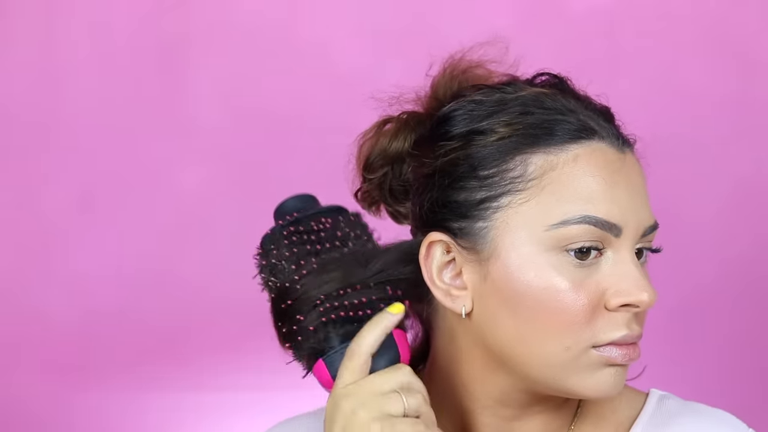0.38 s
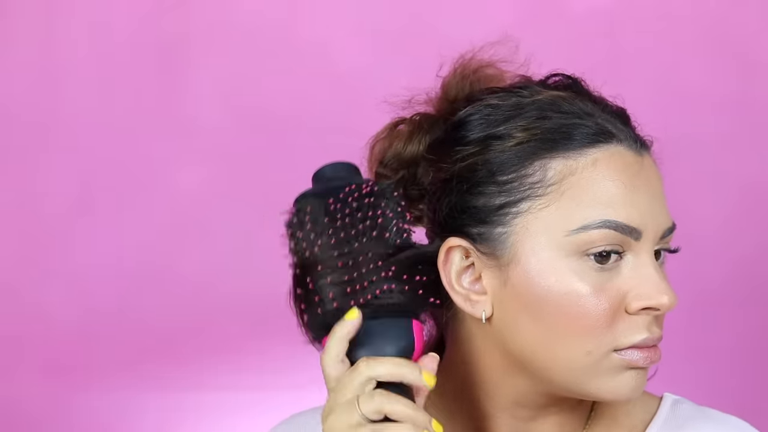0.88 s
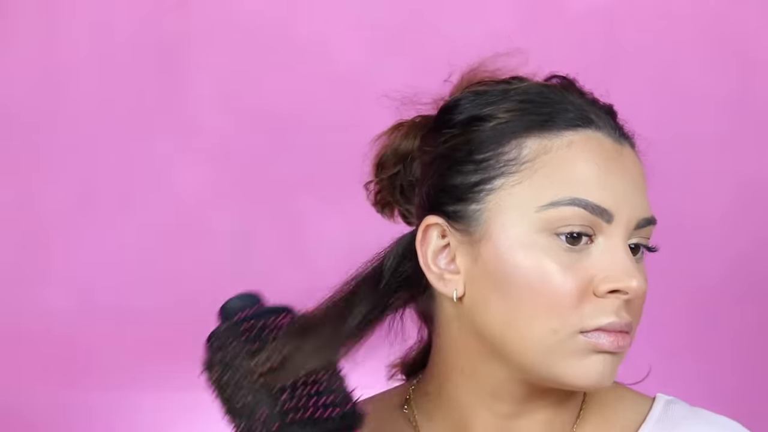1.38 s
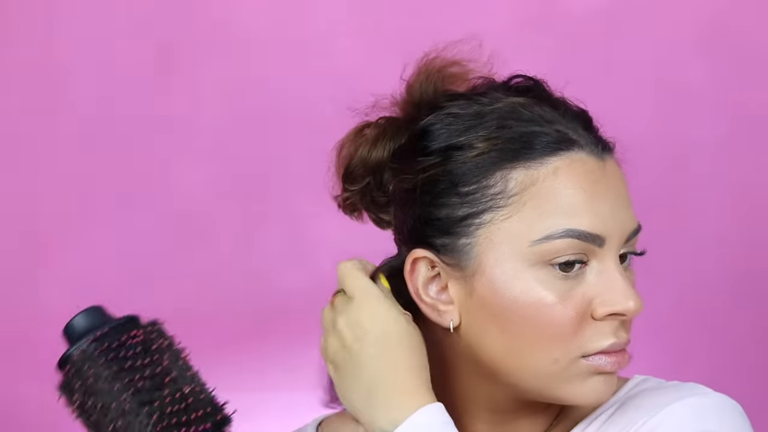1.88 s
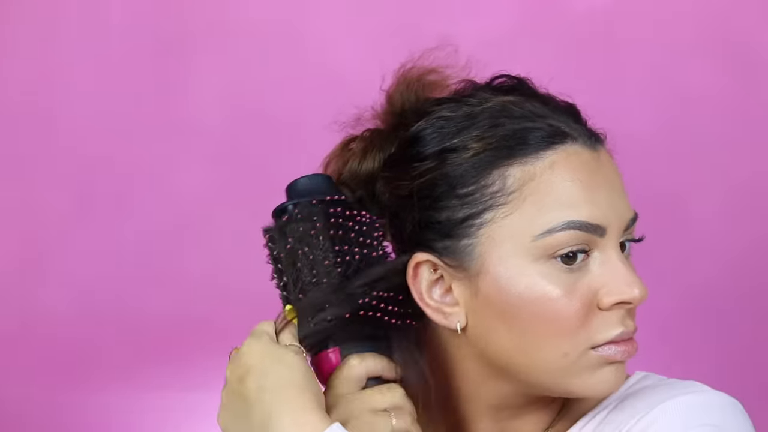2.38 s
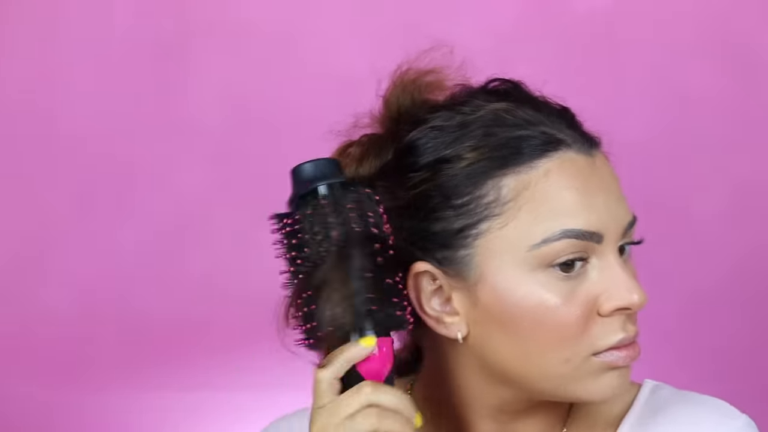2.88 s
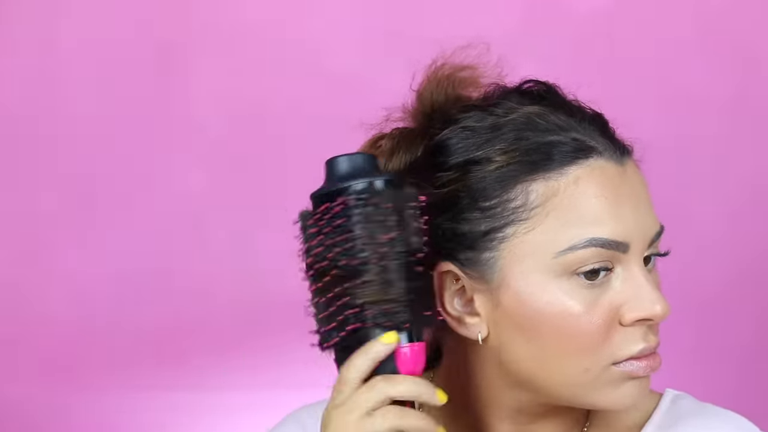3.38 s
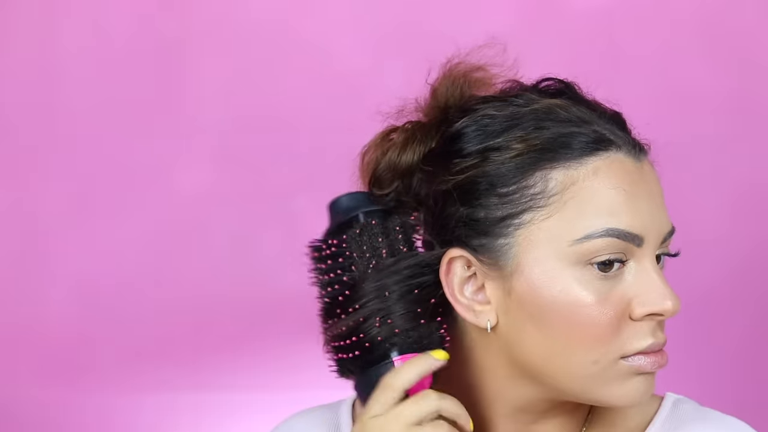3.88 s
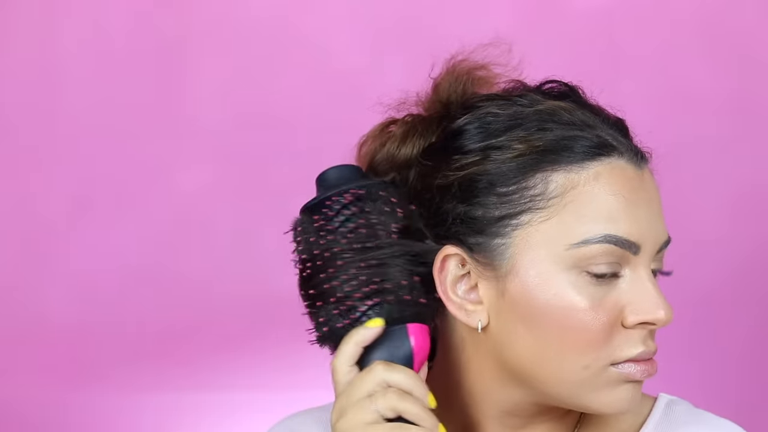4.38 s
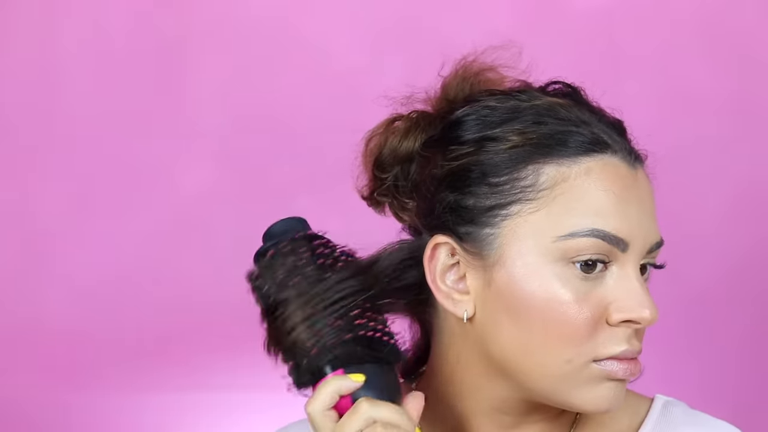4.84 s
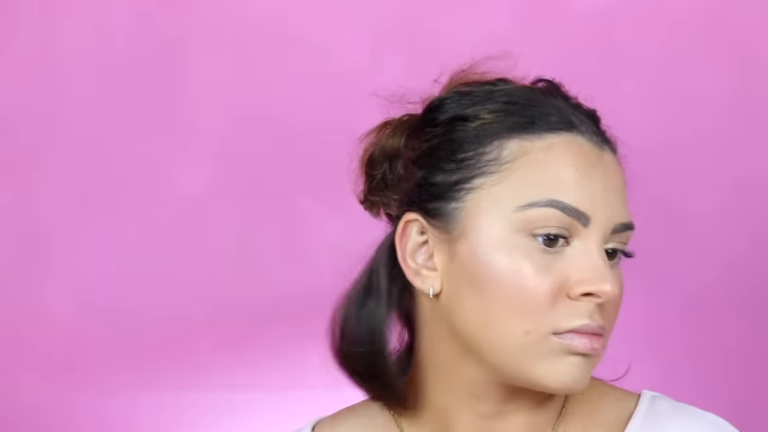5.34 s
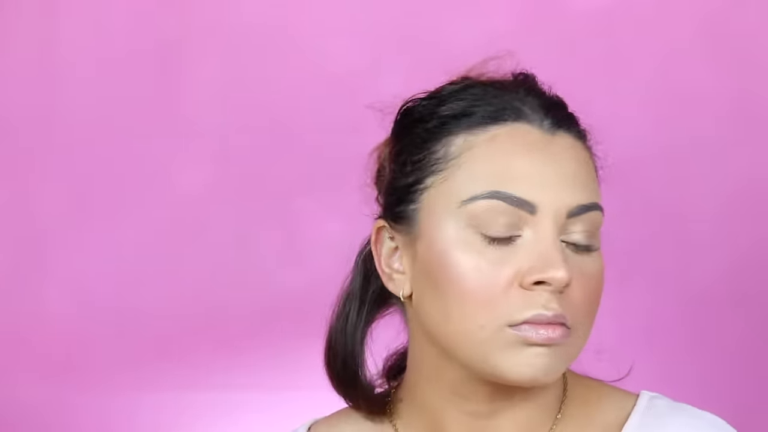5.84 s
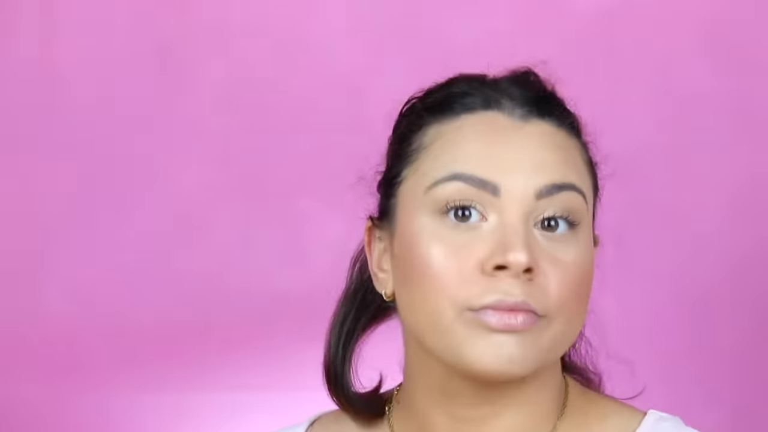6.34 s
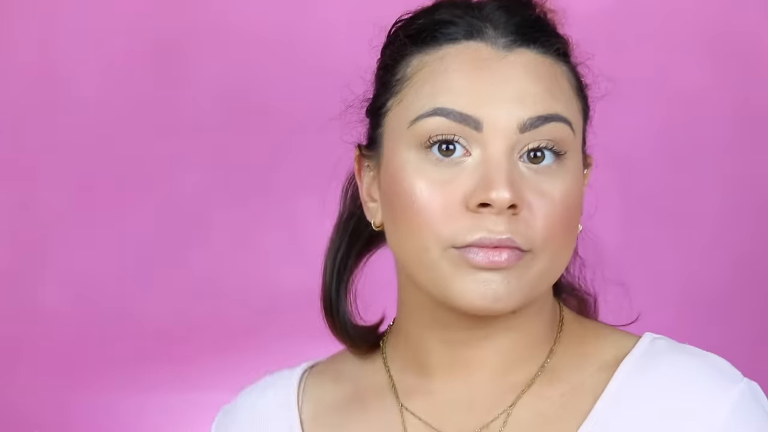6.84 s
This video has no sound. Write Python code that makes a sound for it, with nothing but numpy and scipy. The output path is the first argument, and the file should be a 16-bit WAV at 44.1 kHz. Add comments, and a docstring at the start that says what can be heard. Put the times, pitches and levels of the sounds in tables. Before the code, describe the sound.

A hair dryer brush runs for almost six seconds, close and dry: broad rushing air, slightly boomy and changing colour, under a high fan tone pulsing irregularly. It fades fast, then a cut brings louder room tone and the motor winding down, its hum dropping in pitch with a rough rattling scrape. Hair and cloth swish briefly while the brush meets the tabletop in several muffled bumps.

```python
"""In a room, close to one microphone, a hot-air styling brush roars: shaped noise for the turbulent air,
sines for the whine of a seven-blade fan, whose tones swell and sink as the brush turns in the hair.
The roar fades out; at a cut the room tone jumps up and the motor is heard running down, as a falling
hum with ticks and scrape ringing the housing. Cloth and hair rustle in humps of noise, and the brush
is laid on a table in soft blows that ring its modes."""
import sys
import numpy as np
from scipy import signal
from scipy.io import wavfile
from scipy.ndimage import uniform_filter1d

SR = 44100
rng = np.random.default_rng(int(sys.argv[2]) if len(sys.argv) > 2 else 0)


def level_to_linear(level):
    """Convert decibel levels to linear amplitude factors, elementwise."""
    exponent = np.asarray(level, float) / 20
    return 10 ** exponent


def transcribe(u):
    """Save the signal u as a 16-bit wav file named by the first command-line argument.

    u: samples, shape (n,) or (channels, n), limited to [-1, 1]; the rate is SR.
    q: integer samples, one column per channel.
    """
    v = np.clip(np.atleast_2d(u).T, -1, 1)
    q = np.round(v * 32767).astype(np.int16)
    wavfile.write(sys.argv[1], SR, q)


N = 307818
FRAME, HOP = 1024, 256  # short-time spectra (samples)
HZ = np.fft.rfftfreq(FRAME, 1 / SR)
FRAME_S = np.arange(N // HOP + 5) * HOP / SR
T = np.arange(N) / SR
CUT_S = 6.005
AFTER_CUT = T > CUT_S
FADE_DB = -23  # reached by the roar at the cut


def evened(x):
    """Scales to rms 1."""
    return x / np.sqrt(np.mean(x ** 2) + 1e-20)


def read(points, hz=HZ):
    """Reads a spectrum in dB at the frequencies hz, on a log frequency axis."""
    f, value = np.transpose(points)
    return np.interp(np.log(hz + 1), np.log(f + 1), value)


def columns(rows, t):
    """Reads every column of a curve table at the times t."""
    s, *values = np.transpose(rows)
    return [np.interp(t, s, v) for v in values]


def unit(colour_db):
    """Shifts a spectrum so that its mean power is 0 dB, as a column over frequency."""
    return (colour_db - 10 * np.log10(np.mean(level_to_linear(colour_db) ** 2)))[:, None]


def noise(field_db):
    """Noise from random short-time spectra; 0 dB in all bins gives rms 1."""
    real, imaginary = rng.standard_normal((len(FRAME_S), len(HZ), 2)).T
    spectra = (real + 1j * imaginary) * level_to_linear(field_db)
    return signal.istft(spectra, nperseg=FRAME, noverlap=FRAME - HOP)[1][:N] / 39


def steady_noise(colour_db):
    """Noise of one unchanging colour."""
    return noise(unit(colour_db) + 0 * FRAME_S)


def drift(size, count):
    """Slow chance curves, rms 1 together, smoothed twice over size frames."""
    rows = rng.standard_normal((count, len(FRAME_S)))
    return evened(uniform_filter1d(uniform_filter1d(rows, size), size))


def quick_drift(size):
    """A chance curve of rms 1, smoothed over size samples."""
    return evened(uniform_filter1d(rng.standard_normal(N), size=size))


def resonate(x, hz, width):
    """Two-pole resonance of gain 1 at its peak."""
    return signal.lfilter(*signal.iirpeak(hz, hz / width, SR), x)


def resonate_twice(x, hz, width):
    """Two equal resonances in a row, for steep skirts."""
    return resonate(resonate(x, hz, width), hz, width)


def fading(t, lead_s=0):
    """Progress of the roar's fade: 0 until it starts, 1 at the cut and larger beyond."""
    start_s, curve = 5.8, 1.3
    return np.clip((t + lead_s - start_s) / (CUT_S - start_s), 0, 2) ** curve


def rising_db(t):
    """The quiet layers creep in under the roar and jump up at the cut."""
    start_s, from_db, to_db, after_db = 5.05, -27, -11.5, 1
    share = (t - start_s) / (CUT_S - start_s)
    creep_db = np.where(share < 0, -40, from_db + (to_db - from_db) * share)
    return np.where(t > CUT_S, after_db, creep_db)


# Colour of the room tone: (frequency [Hz], relative level [dB per Hz])
ROOM_COLOUR = [(15, -47), (25, -11), (70, -12.5), (193, -2.5), (267, -7), (538, -10), (1310, -12.5),
               (1910, -14), (5740, -15), (15600, -29.5)]


def room_tone(level_db=-50):
    """Steady coloured noise of the room, lifted along the rise of the quiet layers."""
    return level_to_linear(level_db + rising_db(T)) * steady_noise(read(ROOM_COLOUR))


# Colour of the hiss that differs between the channels: (frequency [Hz], relative level [dB per Hz])
HISS_COLOUR = [(15, -8.5), (25, 5), (550, -9), (920, -16), (1200, -42), (11500, -42), (13000, -23),
               (15600, -16)]


def hiss_apart(level_db=-66):
    """Faint hiss, to be added to one channel and taken from the other; it rises with the room tone."""
    return level_to_linear(level_db + rising_db(T)) * steady_noise(read(HISS_COLOUR))


# Cloth and hair strokes:
# (start [s], length [s], level [dB], centre [Hz], distance from the centre to -3 dB [octaves])
RUSTLE_STROKES = [(6.357, 0.18, -39.5, 3930, 0.59), (6.473, 0.17, -43, 6150, 0.58),
                  (6.662, 0.055, -60, 4400, 0.57), (6.749, 0.049, -33.5, 2090, 1.24),
                  (6.77, 0.11, -38, 6000, 2), (6.848, 0.075, -45, 3880, 0.59)]


def rustles(grain_db=-1.0, dull_hz=9000):
    """Short grainy swishes, each a hump of noise round its own centre, dull at the very top."""
    out = np.zeros(N)
    for s, length, db, hz, octaves in RUSTLE_STROKES:
        hump_db = -3 * (np.log2((HZ + 20) / hz) / octaves) ** 2 - 6 * (HZ / dull_hz) ** 2
        stroke = np.sin(np.pi * np.clip((T - s) / length, 0, 1) ** 0.61) ** 2  # leans to its start
        out += level_to_linear(db) * stroke * steady_noise(hump_db)
    return out * level_to_linear(grain_db * quick_drift(60))


# The brush meets the table:
# (start [s], level [dB], rise [s], share of the table ring [ratio], pitch of the blow [Hz])
TABLE_BLOWS = [(6.577, -36.5, 0.0017, 0.036, 484), (6.753, -34, 0.012, 0.54, 294),
               (6.806, -36, 0.011, 0.14, 282), (6.85, -45.5, 0.0084, 0.54, 280),
               (6.888, -49, 0.0073, 0.3, 280), (6.927, -51, 0.007, 0.22, 282)]
# Modes of the table top: (frequency [Hz], level [dB], time to fall 60 dB [s])
TABLE_MODES = [(177, -7.5, 0.34), (263, -6, 0.51), (286, -7.5, 0.66), (383, -7, 0.31), (522, -1, 0.14),
               (800, -7, 0.22), (1710, -2.5, 0.34), (2170, -2, 0.22)]


def knocks(spread=.075):
    """Soft swelling and dying blows; the table top hums on in rough, noise-driven modes."""
    out, t = np.zeros(N), np.arange(SR // 2) / SR
    for s, db, rise, share, hz in TABLE_BLOWS:
        blow = np.sin(2 * np.pi * hz * t) * (t / rise) * np.exp(1 - t / rise)
        shaken = rng.standard_normal(SR)
        ring = 0
        for mode_hz, mode_db, t60 in TABLE_MODES:
            mode = evened(resonate_twice(shaken, mode_hz, spread * mode_hz)[-len(t):])
            ring = ring + level_to_linear(mode_db - 60 * t / t60) * mode
        sound = level_to_linear(db) * (blow + share * ring * (1 - np.exp(-t / rise)))
        part = out[round(s * SR):][:len(t)]
        part += sound[:len(part)]
    return out


def rotor():
    """The slowing shaft: commutator ticks a second, octaves of speed lost, and tick periods turned."""
    spin_hz, stop_s, braking = 525, .55, 1.7  # tick rate at the cut, time to near rest, curve of slowing
    speed = np.clip(1 - (T - CUT_S) / stop_s, .02, 1) ** braking
    tick_hz = spin_hz * speed
    return tick_hz, -np.log2(speed), np.cumsum(tick_hz) / SR


def rub():
    """The slowing rotor starts to rub, then lets go: two ramps from 0 to 1."""
    rubbing = np.clip((T - 6.05) / .02, 0, 1)
    freed = np.clip((T - 6.27) / .04, 0, 1)
    return rubbing, freed


# Colour of the last air: (frequency [Hz], relative level [dB per Hz])
LAST_AIR_COLOUR = [(59, -59), (100, -35), (743, -3), (1490, -13), (2530, -21), (2810, -28), (3120, -20),
                   (5300, -14), (15600, -63)]


def last_air(puff_db=-31.5, puff_s=.02, level_db=-35.5, fall_db_per_s=18):
    """A puff of air at the cut and a breeze that sinks with time and with the rotor's speed."""
    octaves = rotor()[1]
    late = np.maximum(T - CUT_S, 0)
    puff = level_to_linear(puff_db) * np.exp(-late / puff_s)
    breeze = level_to_linear(level_db - fall_db_per_s * late - octaves)
    return AFTER_CUT * (puff + breeze) * steady_noise(read(LAST_AIR_COLOUR))


# Modes of the housing: (frequency [Hz], nominal width [Hz], level under ticks [dB], under scrape [dB])
HOUSING_MODES = [(761, 24, -4, 2.5), (1356, 340, -7.5, -6.5), (1540, 250, -7, -16), (2700, 540, -6, -22),
                 (4300, 460, -9, -15), (4610, 260, 3.5, -20), (5270, 220, -5, -23), (6000, 230, -14, -29),
                 (9250, 1300, -21.5, -37), (10300, 1300, -14, -29)]
# Drives of the housing, relative:
# (before the rub [dB], while it lasts [dB], loss [dB per octave of speed], loss as the rub lets go [dB])
TICK_DRIVE = (-47.5, -35.5, 7, 7)
SCRAPE_DRIVE = (-40, -28, 3, 4)


def drive_gain(drive):
    """Gain of the ticks or the scrape after the cut, following the rub and the falling speed."""
    free_db, rub_db, per_octave_db, drop_db = drive
    octaves, (rubbing, freed) = rotor()[1], rub()
    level_db = free_db + (rub_db - free_db) * rubbing
    return AFTER_CUT * level_to_linear(level_db - per_octave_db * octaves - drop_db * freed)


def housing(uneven_db=2.0, jitter=0.03, blur=0.5, resonance_db=14, early_scrape_db=-27):
    """Commutator ticks and a noisy scrape ring the modes of the housing; jitter is in tick periods."""
    tick_hz, _, turns = rotor()
    passed = np.maximum.accumulate(np.floor(turns + jitter * quick_drift(100)))
    ticks = np.diff(passed, prepend=0) * np.sqrt(SR / tick_hz)  # equal power at every tick rate
    ticks = ticks * level_to_linear(uneven_db * rng.standard_normal(N)) + blur * rng.standard_normal(N)
    ticks = drive_gain(TICK_DRIVE) * ticks
    early = ~AFTER_CUT * level_to_linear(early_scrape_db + rising_db(T))  # creeps in under the roar
    scrape = (drive_gain(SCRAPE_DRIVE) + early) * rng.standard_normal(N)
    ring = 0
    for hz, width, tick_db, scrape_db in HOUSING_MODES:
        drive = level_to_linear(tick_db) * ticks + level_to_linear(scrape_db) * scrape
        ring = ring + resonate_twice(drive, hz, 1.36 * width)
    return level_to_linear(resonance_db) * ring


# How the casing radiates the hum: (frequency [Hz], level [dB])
HUM_RADIATION = [(250, -30), (400, -3), (520, 0), (800, 0.5), (1300, -2), (1700, -9), (2500, -24)]


def falling_hum(level_db=-39, per_octave_db=8.5, ring_db=10, shake=.035, upper_db=3.5, flutter_db=2.5):
    """Five partials of the tick rate, sinking with the speed and ringing the lowest housing mode."""
    tick_hz, octaves, turns = rotor()
    rubbing = rub()[0]
    unsteady = uniform_filter1d(uniform_filter1d(rng.standard_normal(N), size=300), size=300)
    shaky = turns + shake * evened(unsteady)  # in tick periods
    hum = 0
    for k in range(1, 6):
        upper_loss_db = upper_db * max(k - 2, 0) * (1.5 - rubbing)  # the rub brightens the hum
        partial = np.sin(2 * np.pi * k * shaky + k * k)
        hum = hum + level_to_linear(read(HUM_RADIATION, k * tick_hz) - upper_loss_db) * partial
    hum = hum * level_to_linear(flutter_db * quick_drift(600))
    hum = AFTER_CUT * level_to_linear(level_db - per_octave_db * octaves) * hum
    lowest_hz, lowest_width = HOUSING_MODES[0][:2]
    return hum + level_to_linear(ring_db) * resonate(hum, lowest_hz, lowest_width)


# Mean pitch of the fan: (time [s], blades passing [Hz])
BLADE_PASS_CURVE = [(0.0, 3284), (0.61, 3300), (1.75, 3294), (3.17, 3302), (3.6, 3290), (3.99, 3306),
                    (4.71, 3300), (5.69, 3311), (5.75, 3300)]
# Tones always there, fluttering by chance: (multiple of the shaft speed [ratio], level [dB])
STEADY_ORDERS = [(1, -62), (2, -60), (3, -59), (5, -56), (6, -52), (7, -52), (8, -52), (10, -52), (12, -56),
                 (14, -48), (21, -64)]
# A tone swells while the brush is turned so that its reflections add up:
# (start [s], length [s], multiple of the shaft speed [ratio], level at its middle [dB])
TONE_SWELLS = [(-0.03, 0.31, 7, -33.5), (0.26, 0.38, 7, -30.5), (0.615, 0.17, 7, -37),
               (0.805, 0.13, 7, -32.5), (0.93, 0.12, 7, -38), (1.086, 0.22, 7, -30.5),
               (1.273, 0.16, 7, -33), (1.46, 0.077, 7, -39), (1.512, 0.18, 7, -30.5), (1.652, 0.22, 7, -32),
               (1.84, 0.34, 7, -36), (2.086, 0.2, 7, -40.5), (2.299, 0.18, 7, -33.5),
               (2.44, 0.12, 7, -36.5), (2.57, 0.077, 7, -40), (2.622, 0.22, 7, -30),
               (2.792, 0.31, 7, -29.5), (3.061, 0.152, 7, -29.5), (3.204, 0.096, 7, -32.5),
               (3.27, 0.21, 7, -35), (3.486, 0.21, 7, -31), (3.685, 0.21, 7, -32), (3.873, 0.25, 7, -30.5),
               (4.122, 0.075, 7, -35), (4.176, 0.22, 7, -33.5), (4.378, 0.12, 7, -35.5),
               (4.47, 0.19, 7, -30.5), (4.653, 0.15, 7, -32), (4.76, 0.21, 7, -28.5),
               (4.94, 0.18, 7, -35.5), (5.102, 0.18, 7, -32), (5.298, 0.1, 7, -30.5), (5.408, 0.1, 7, -31),
               (5.48, 0.3, 7, -39.5), (-0.1, 0.24, 14, -48), (0.387, 0.22, 14, -38.5),
               (0.634, 0.24, 14, -39), (0.94, 0.075, 14, -34.5), (1.03, 0.06, 14, -38),
               (1.32, 0.12, 14, -46), (1.47, 0.25, 14, -41), (1.868, 0.27, 14, -40),
               (2.156, 0.25, 14, -36.5), (2.402, 0.34, 14, -37), (2.758, 0.1, 14, -39),
               (3.62, 0.14, 14, -44.5), (3.18, 0.074, 14, -42), (3.785, 0.14, 14, -39),
               (5.02, 0.18, 14, -41), (5.288, 0.11, 14, -41), (5.49, 0.16, 14, -43),
               (-0.09, 0.33, 1, -51.5), (0.3, 0.57, 1, -49), (0.9, 0.36, 1, -48), (1.39, 0.72, 1, -44.5),
               (2.056, 0.49, 1, -50), (2.496, 0.58, 1, -47.5), (3.13, 0.68, 1, -49.5),
               (3.736, 0.34, 1, -53), (4.287, 0.42, 1, -47.5), (4.905, 0.69, 1, -49.5),
               (0.35, 0.63, 2, -49), (1.4, 0.75, 2, -49), (2.436, 0.65, 2, -49), (3.82, 0.36, 2, -48),
               (4.32, 0.27, 2, -46.5), (4.95, 0.56, 2, -49), (3.1, 0.6, 2, -56.5), (0.847, 0.35, 2, -53.5),
               (5.507, 0.26, 2, -48), (0.357, 0.18, 3, -48.5), (0.685, 0.22, 3, -49.5), (2.5, 0.48, 3, -51),
               (2.968, 0.22, 3, -46.5), (3.166, 0.31, 3, -42), (3.45, 0.3, 3, -46.5),
               (3.897, 0.27, 3, -41.5), (4.14, 0.57, 3, -46), (4.907, 0.47, 3, -50), (0.2, 0.59, 5, -47),
               (0.748, 0.52, 5, -47.5), (1.252, 0.23, 5, -46), (2.15, 0.63, 5, -49), (4.05, 0.25, 5, -49),
               (4.32, 0.24, 5, -45.5), (3.01, 0.23, 5, -45), (5.39, 0.42, 5, -42.5), (0.3, 0.59, 6, -47),
               (1.15, 0.37, 6, -45), (1.8, 0.18, 6, -52), (2.406, 0.65, 6, -46), (3.01, 0.45, 6, -46),
               (3.664, 0.099, 6, -38.5), (4.123, 0.19, 6, -42.0), (4.68, 0.2, 6, -43), (4.86, 0.39, 6, -46),
               (5.4, 0.53, 6, -49), (3.35, 0.15, 10, -42), (5.58, 0.22, 10, -42)]


def whine(waver=0.00036, wander_rad=1.18, blades=7, lead_s=.04):
    """Sines on the shaft orders; reflections make each swell, flutter and slip in phase on its own."""
    edge_s, sag_db, lean_db = .03, -5, -1  # a swell's ends lie lower, the last more than the first
    wavering = 1 + waver * np.interp(T, FRAME_S, drift(size=6, count=1)[0])
    shaft_hz = columns(BLADE_PASS_CURVE, T)[0] / blades * wavering
    angle = 2 * np.pi * np.cumsum(shaft_hz) / SR
    count = len(STEADY_ORDERS)
    scatter, ahead, slips = (drift(size=size, count=count) for size in (12, 12, 30))
    paths = (scatter + 1j * ahead) / np.sqrt(2)  # many weak reflections sum to a random size and phase
    height = {k: level_to_linear(db) * path for (k, db), path in zip(STEADY_ORDERS, paths)}
    for s, length, k, db in TONE_SWELLS:
        along = 2 * (FRAME_S - s) / length - 1  # -1 to 1 through the swell
        edge = np.clip((1 - abs(along)) * length / 2 / edge_s, 0, 1)
        swell_db = db + sag_db * along ** 2 + lean_db * np.clip(along, -1, 1)
        height[k] = height[k] + edge * level_to_linear(swell_db)
    out = 0
    for (k, h), slip in zip(height.items(), slips):
        envelope = np.interp(T, FRAME_S, h * np.exp(1j * wander_rad * slip))
        out = out + (envelope * np.exp(1j * k * angle)).imag
    return np.sqrt(2) * level_to_linear(FADE_DB * fading(T, lead_s)) * out  # the tones fade ahead of the air


# Course of the air: (time [s], level before the common offset [dB],
# hair over the vents [0-1], vents turned to the microphone [0-1])
AIR_COURSE = [(0, -31.5, 0.5, 0.11), (.5, -32.5, 0.74, .4), (.9, -30.5, 0.32, 0.21), (1.3, -33, 0.58, 0.35),
              (1.6, -33.5, 0.38, 0.8), (2.05, -33, 0, 0.61), (2.45, -32.5, 0.73, 0.63),
              (2.9, -34.5, 0.45, 0.62), (3.3, -32, 0.65, 0.26), (3.6, -32.5, 0.69, 0.61),
              (4.0, -32.5, 0.74, 0.49), (4.5, -32, 0.63, 0.37), (4.9, -32, 0.69, 0.25), (5.3, -33, .2, 0.5),
              (5.7, -33.5, 0, 1)]
# Colour of the jet: (frequency [Hz], relative level [dB per Hz])
JET_COLOUR = [(24, -86), (60, -66), (130, -36.5), (250, -22.5), (400, -14), (560, -12.5), (700, -5),
              (900, -8), (1130, -12.5), (2220, -9.5), (2800, -8.5), (3570, -8), (5700, -6), (7000, -11),
              (11800, -26), (15600, -42.5)]
# Colour change from bare to covered by hair: (frequency [Hz], level [dB])
COVERED_CHANGE = [(300, 2), (720, 10.5), (1500, 0), (2800, -0.5), (4800, -1)]
# Colour change from vents turned away to facing: (frequency [Hz], level [dB])
FACING_CHANGE = [(400, 4), (900, 9), (1900, 8.5), (3000, 2.5), (4800, -1.5), (9500, 6)]


def air(offset_db=7.5, patchy_db=1.1, streaky_db=1.5, flicker_db=1.0, treble_fade_db=-7):
    """Turbulent jet through the bristles; its colour shifts as hair covers the vents and the brush turns."""
    boom_hz, boom_octaves, boom_lumps = 800, 0.13, 0.9
    level_db, cover, facing = columns(AIR_COURSE, FRAME_S)
    shift_db = np.outer(read(COVERED_CHANGE), cover - .5) + np.outer(read(FACING_CHANGE), facing - .5)
    # the fade takes more from each higher octave
    fade_db = np.outer(FADE_DB + treble_fade_db * np.log2((HZ + 500) / 4000), fading(FRAME_S))
    wide, narrow = rng.standard_normal((len(FRAME_S), len(HZ), 2)).T
    patches = evened(uniform_filter1d(uniform_filter1d(wide, size=14, axis=0), size=18, axis=1))
    # reflections comb the jet into streaks
    streaks = evened(uniform_filter1d(uniform_filter1d(narrow, size=4, axis=0), size=40, axis=1))
    # round the barrel boom the level varies more
    boom = np.exp(-(np.log2((HZ + 1) / boom_hz) / boom_octaves) ** 2)[:, None]
    chance_db = (1 + boom_lumps * boom) * (patchy_db * patches + streaky_db * streaks)
    chance_db = chance_db + flicker_db * drift(size=3, count=1)
    return noise(unit(read(JET_COLOUR)) + shift_db + fade_db + chance_db + level_db + offset_db)


def scene():
    """The roar up to the cut, the quiet layers rising under its fade, over the room tone."""
    before_cut = 1 - np.clip((T - CUT_S) / 0.00083, 0, 1)
    rundown = last_air() + housing() + falling_hum()
    roar = before_cut * (whine() + air())
    mono = room_tone() + rustles() + knocks() + rundown + roar
    apart = hiss_apart()
    return np.array([mono + apart, mono - apart])


def band_limit(x):
    """A steep low-pass at the top of the band."""
    return signal.sosfilt(signal.butter(12, 15700, fs=SR, output="sos"), x)


def record(dry):
    """One microphone heard on both channels, taken as mixed."""
    return band_limit(dry)


dry = scene()
out = record(dry)
transcribe(out)
```